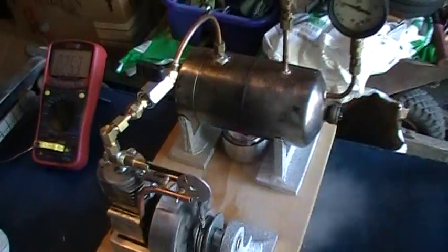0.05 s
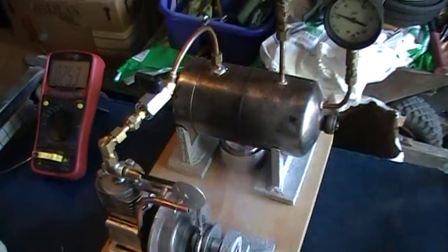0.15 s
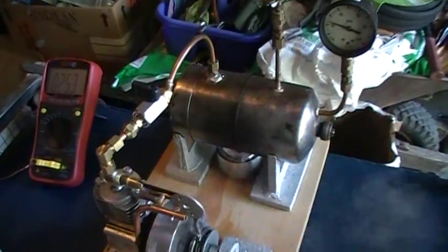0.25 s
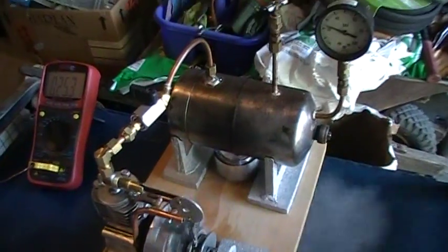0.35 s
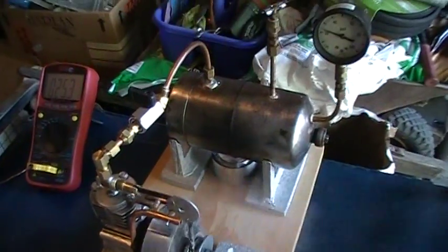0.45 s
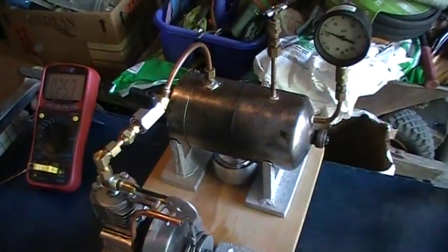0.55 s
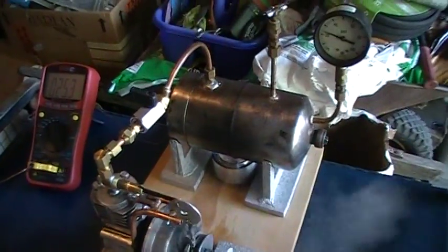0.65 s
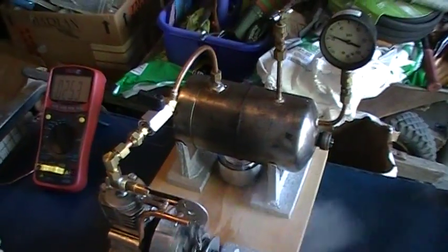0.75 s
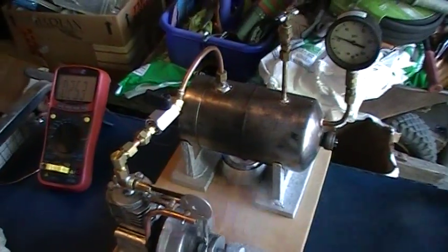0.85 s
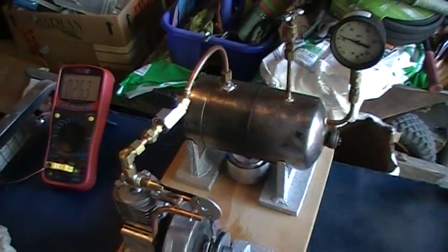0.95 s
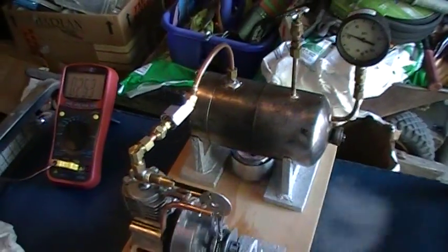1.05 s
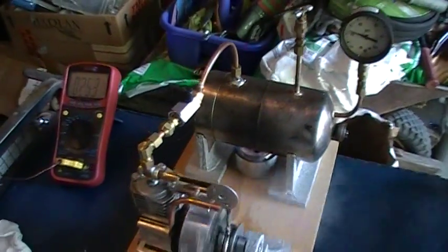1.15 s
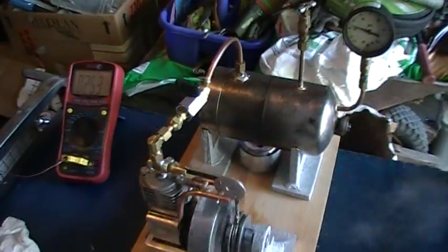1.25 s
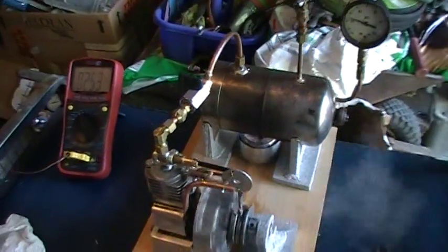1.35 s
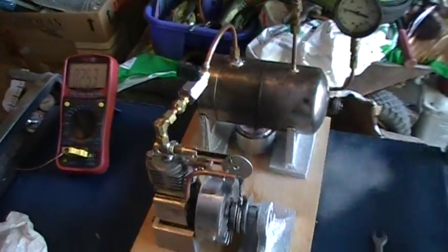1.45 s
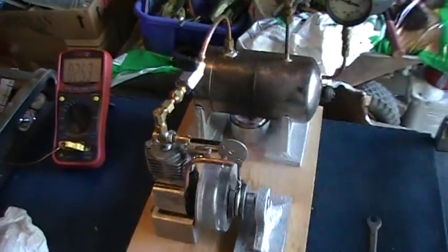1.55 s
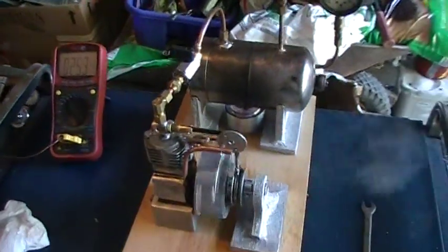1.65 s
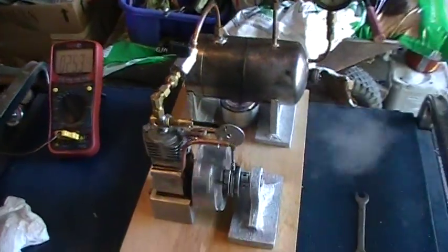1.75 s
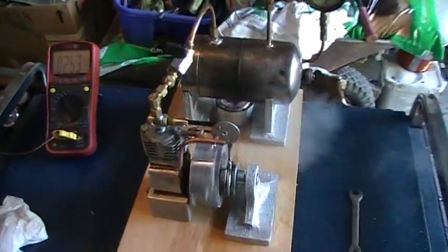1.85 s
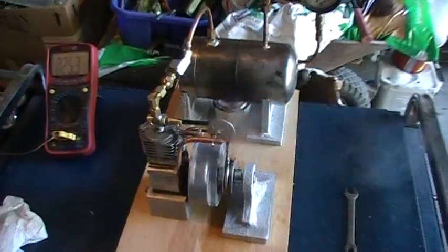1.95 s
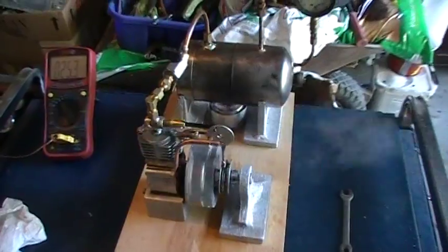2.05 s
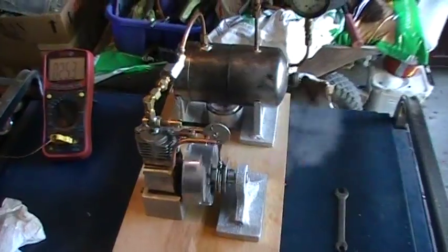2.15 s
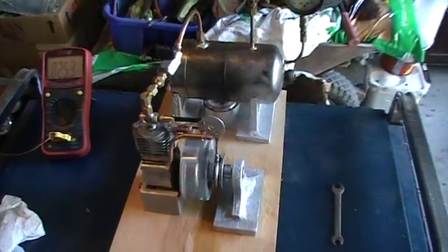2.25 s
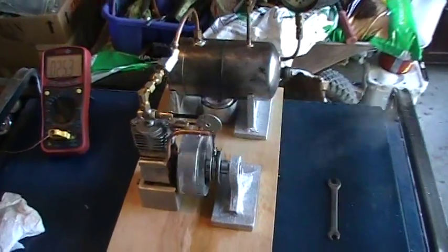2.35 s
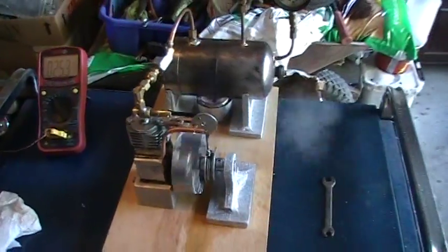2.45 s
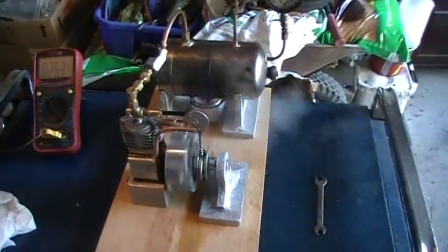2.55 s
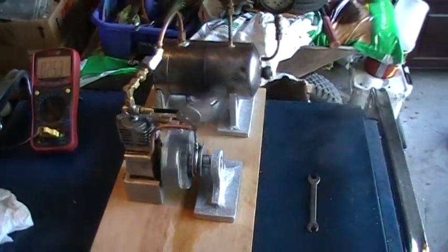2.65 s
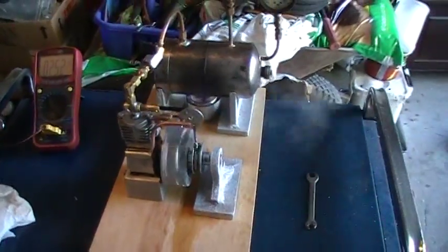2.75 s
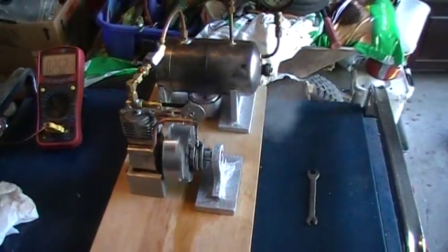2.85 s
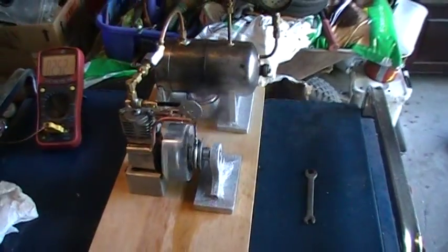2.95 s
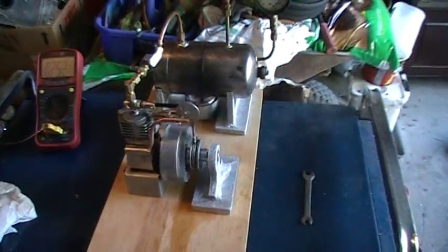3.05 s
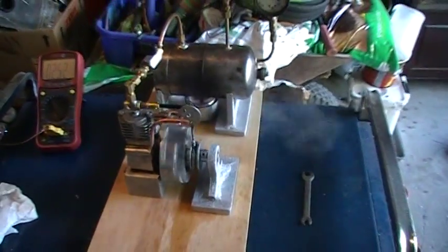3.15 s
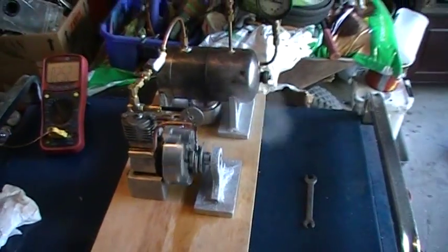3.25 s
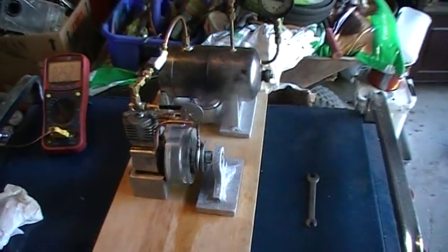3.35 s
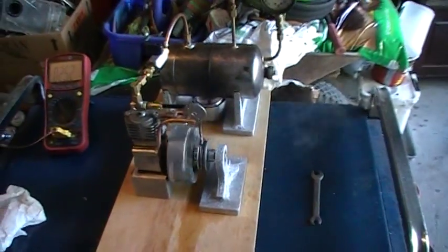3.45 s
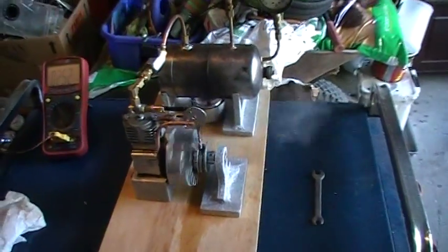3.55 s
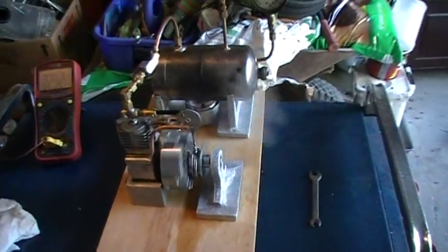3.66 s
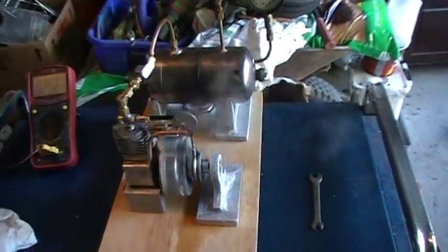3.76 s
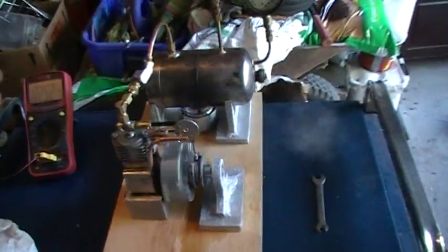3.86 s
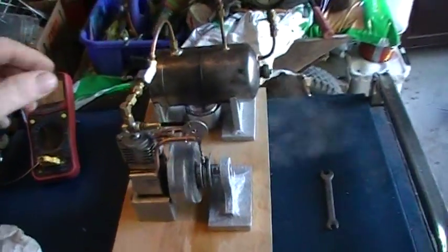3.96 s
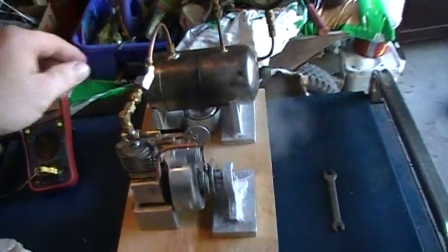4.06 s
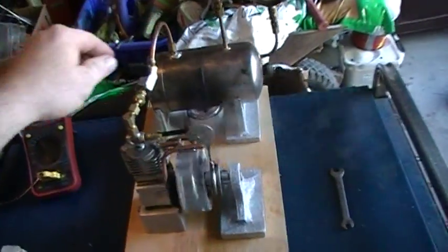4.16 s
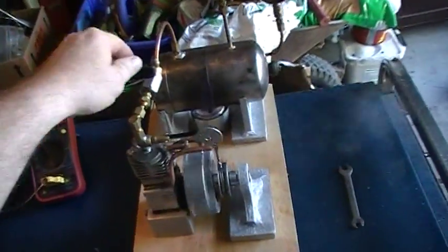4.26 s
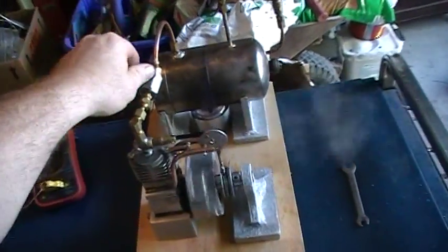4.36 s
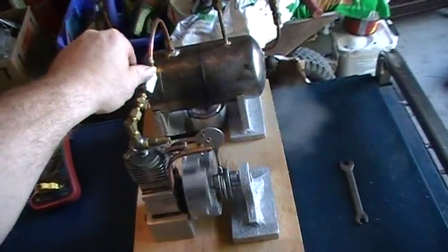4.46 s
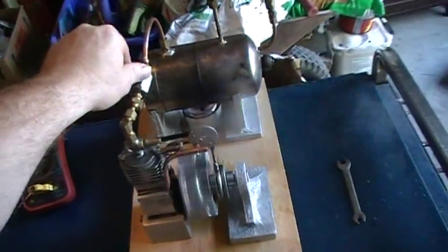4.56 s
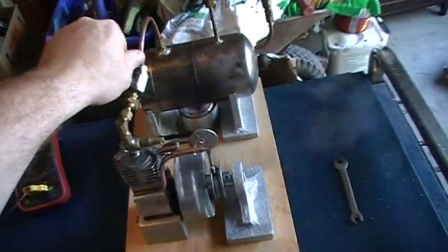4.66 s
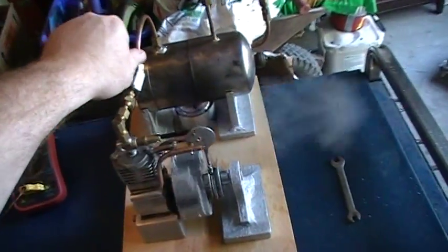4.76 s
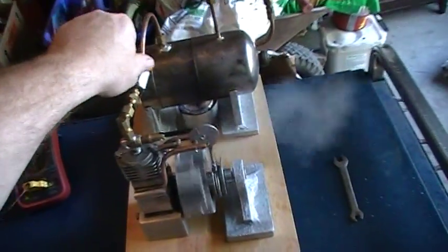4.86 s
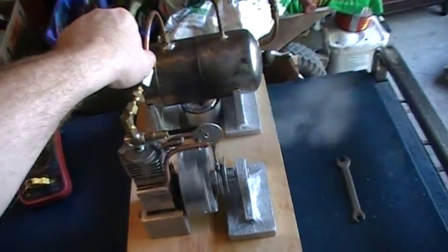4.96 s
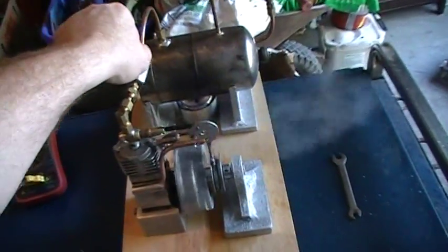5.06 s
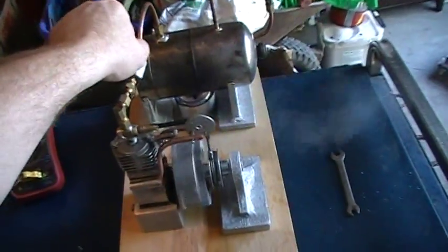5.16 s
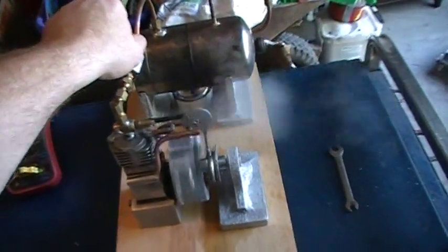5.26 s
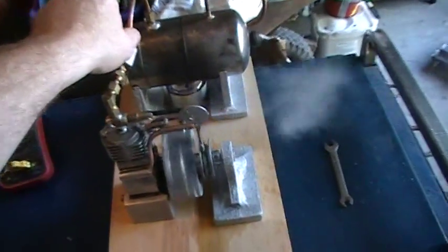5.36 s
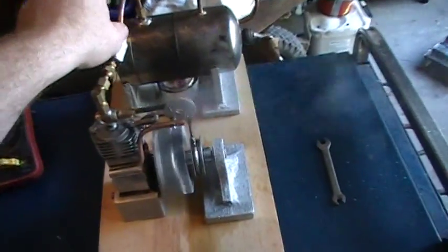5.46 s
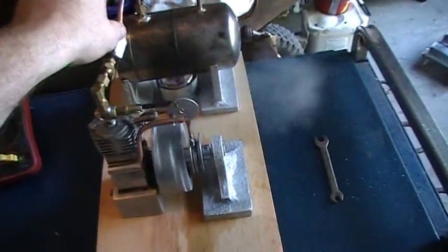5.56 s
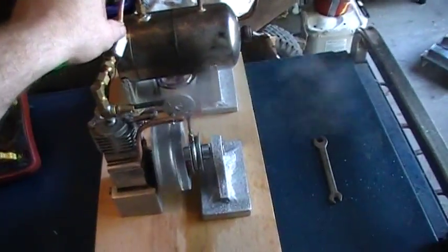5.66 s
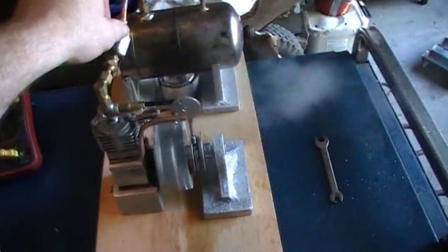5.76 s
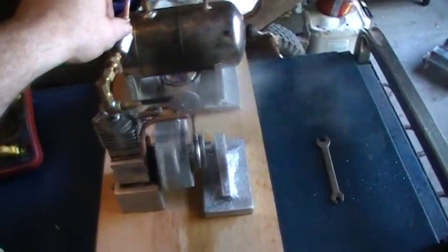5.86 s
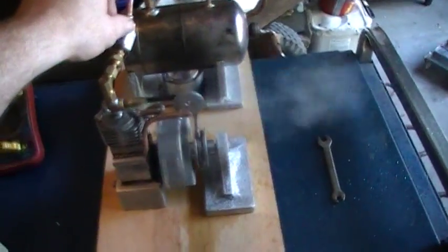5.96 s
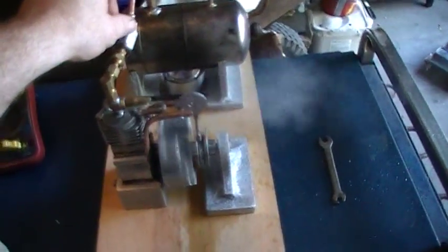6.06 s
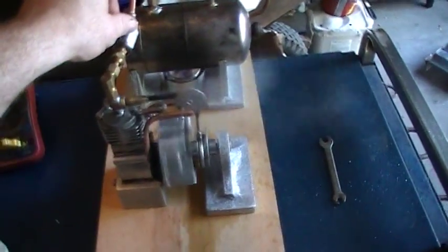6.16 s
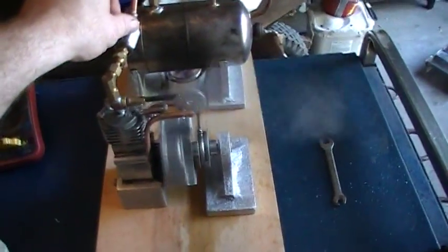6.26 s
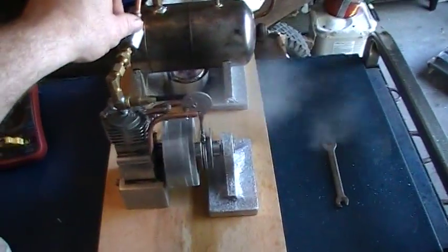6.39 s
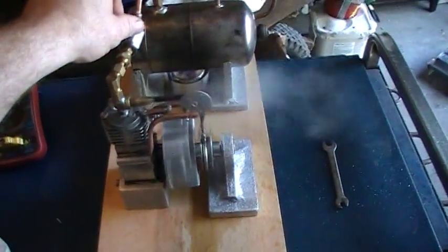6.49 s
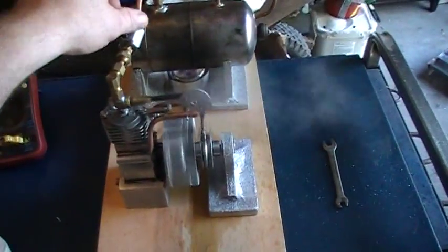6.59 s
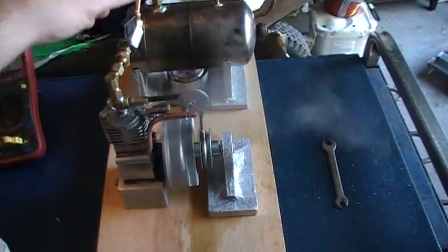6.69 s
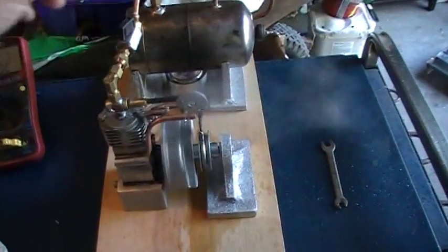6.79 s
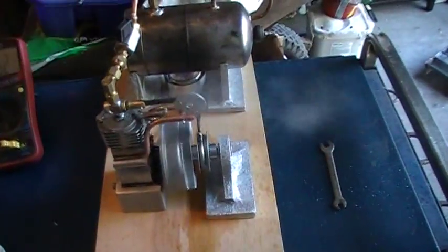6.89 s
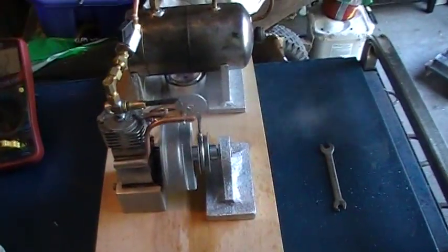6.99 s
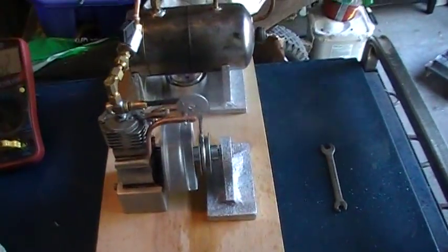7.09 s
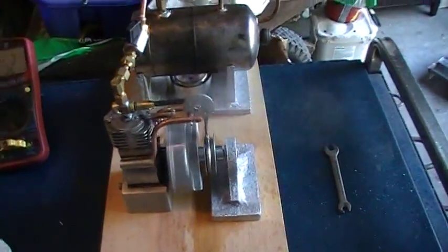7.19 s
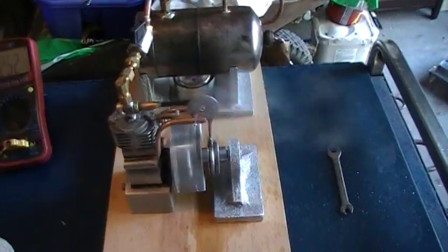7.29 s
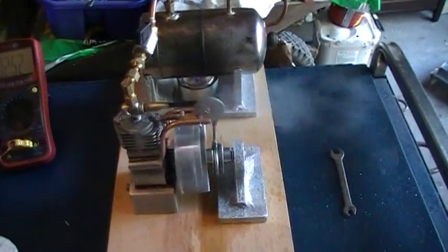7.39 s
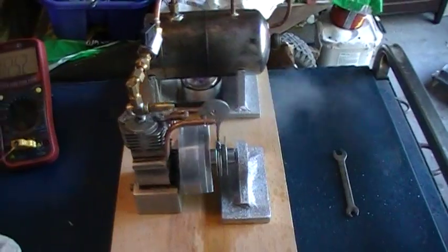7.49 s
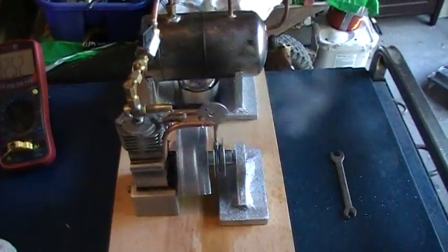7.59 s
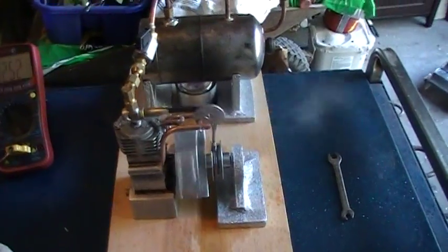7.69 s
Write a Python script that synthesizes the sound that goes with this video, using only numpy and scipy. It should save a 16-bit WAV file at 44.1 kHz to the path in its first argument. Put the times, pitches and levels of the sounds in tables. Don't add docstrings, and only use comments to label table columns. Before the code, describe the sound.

A small steam engine runs close to a stereo microphone in a garage. From 0 to about 4.5 seconds, sharp exhaust puffs come a little over seven per second, each a bright, dry burst of hiss with a second softer push right behind it, strongest in the high treble. Between them are loose metallic knocks, piston rubbing and uneven hollow slaps, some louder, near 1, 1.8, 3.3 and 4.5 seconds. Low hum and a faint leaking hiss sit underneath. At about 4.55 the rhythm stumbles for one or two slow turns, with a loud clack near 4.7, then accelerates: about thirteen puffs a second at 5.1, seventeen at 6.2, nearly twenty-two by the end at 7.7. Puffs merge into a fluttering, buzzing hiss, valve ticks and rod knocks tighten into a steady rattle, and the board hums harder. Short garage echo throughout; it ends still running fast.

```python
import sys
import numpy as np
from scipy import signal
from scipy.fft import rfft, irfft, next_fast_len
from scipy.io import wavfile
from scipy.ndimage import uniform_filter1d

SR = 44100
rng = np.random.default_rng(int(sys.argv[2]) if len(sys.argv) > 2 else 0)


def ratio_of_db(decibels):
    return 10 ** (np.asarray(decibels, float) / 20)


def unload_audio(sound):
    columns = np.transpose(np.atleast_2d(sound))
    steps = np.round(np.clip(columns, -1, 1) * 32767)
    wavfile.write(sys.argv[1], SR, steps.astype(np.int16))


N = 340893

SLOW_PER_S, FAST_PER_S = 7.2, 20.5
STUMBLE_PER_S = 6.6
SIDES = np.array([[1], [-1]])

# (time [s], rate [turns/s])
SPEED = [(0, 7.17), (.862, 7.133), (.871, 6.976), (1.777, 7.39), (2.117, 6.912), (2.233, 7.13),
         (3.425, 7.393), (3.912, 7.603), (4.512, 7.423), (4.548, 5.582), (4.617, 5.824), (4.804, 9.204),
         (5.142, 12.919), (5.458, 14.669), (5.624, 15.095), (6.168, 17.427), (6.693, 19.35), (7.73, 21.938)]
PARTS = {"blast": (-18, -0.34, -1.75, 11, 0.73, 1.3), "push": (-21, 2, -6.5, 2.2, 1.65, -1.5),
         "tick": (-51.5, 8.5, 16, 0.75, 3, -5), "rub": (-40, 3, 6.5, 0.6, 1.4, -8),
         "knock": (-39.5, -3, 11.5, .5, 1.27, -9)}
# (crank angle [turn], slow level [dB], fast level [dB])
BLAST_FLOW = [(-.012, -55, -12), (.012, -7, 2.5), (.04, 0, 3), (.075, -0.5, 2.5), (.11, -6, 2),
              (.14, -16.5, 4.5), (.18, -29.5, -8), (.3, -37.5, -33), (.37, -48, -30), (.5, -70, -60)]
# (crank angle [turn], slow level [dB], fast level [dB])
PUSH_FLOW = [(.15, -40, -28), (.2, -6, 4.5), (.25, -5, -4), (.295, 1.5, 6.5), (.32, -6.5, -4.5),
             (.36, -25, 8.5), (.4, -58, -9), (.45, -70, -50)]
# (frequency [Hz], slow density [dB/Hz], fast density [dB/Hz])
JET_SPECTRUM = [(700, -26, -40), (1190, -25, -19), (1910, -13, -9), (2350, -19, -24), (2780, -9.5, -10.5),
                (3940, -14, -14), (3900, -7.5, -9.5), (5680, -14, -12.5), (7740, -8, -8.5), (8580, -0.5, 1),
                (9360, 4, -8), (10950, -10, -3), (11170, -11, -11.5), (15500, -20.5, -23.5)]
# (time [s], left minus right [dB])
JET_PAN = [(0.0, 1.0), (0.95, 0.5), (1.418, 1.5), (2.86, 0.5), (3.77, 0.5), (5.209, 0.0), (6.05, 1),
           (7.73, 1.0)]
# (crank angle [turn], slow level [dB], fast level [dB])
RUB_PRESSURE = [(0, -1.5, -9), (.1, 1, -0.5), (.3, -4.5, 1), (.45, -9, 2.5), (.62, -10, 2),
                (.635, 6.5, -14), (.72, 0, 7), (.8, -2, -6.5), (.9, -2, 3), (1, 4, 3)]
# (frequency [Hz], width [Hz], slow level [dB], fast level [dB])
BORE_MODES = [(1350, 96, 0.5, -4), (1493, 108, -3, -4), (1680, 98, -5, -4), (1822, 97, -3, -2.5),
              (2008, 220, -5.5, -3), (2450, 190, -6.5, -4), (2790, 380, -12, -8), (4190, 670, -17, -18),
              (5080, 560, -15, -16.5)]
# (time [s], peak level [dB], pitch [Hz])
HARD_SLAPS = [(.0662, -20, 1960), (.406, -29, 1420), (.6509, -21.5, 1880), (.7846, -21.5, 1950),
              (.8175, -36, 1350), (.847, -26, 1920), (.9807, -20.5, 1820), (1.1184, -15, 1910),
              (1.2567, -34, 1340), (1.667, -21, 1970), (1.7674, -15, 1930), (1.8233, -19, 2020),
              (1.933, -16, 1700), (2.0383, -27, 1840), (2.0934, -27, 1350), (2.5072, -32, 1640),
              (2.7526, -25, 1340), (3.152, -17, 1340), (3.1847, -22, 1340), (3.3204, -16.5, 1410),
              (3.342, -24, 1360), (3.5505, -29, 1350), (3.7127, -21, 1340), (3.7362, -21, 1340),
              (4.0114, -26, 1680), (4.2617, -17, 1650), (4.4902, -20, 1360), (4.5251, -16.5, 1390),
              (4.684, -14, 1790)]
# (crank angle [turn], slow level [dB], fast level [dB], brightness [0-1])
CONTACTS = [(.0, -7, -32, 0.5), (.15, 1, -6, 0.95), (.24, -5.5, -5.5, 0), (.36, -7.5, -3.5, 1),
            (.45, -9, -9.5, 0.7), (.52, -12, 6.5, 0.2), (.645, 0, -27, 0.28), (.69, -5, 0.5, 0.89),
            (.75, -32, -23, 0.27), (.79, -11, -2, 0.1), (.93, -1, -2.5, 0)]
# (frequency [Hz], level [dB], t60 [s])
FRAME_MODES = [(326, -20, 0.05), (546.3, -7, 0.047), (583, -5, 0.058), (717, -0.5, 0.047),
               (750.6, -2, 0.042), (862, -6, 0.027), (939, -6, 0.045), (1030.6, -5, 0.033),
               (1340, -16.5, 0.025), (1978, -11.5, 0.054), (2990, -22.5, 0.075), (4390, -11.5, 0.012)]
# (time [s], knock gain [dB])
FRAME_PLAY = [(0, 1), (1.9, 2), (2.3, -0.5), (4.1, -1), (4.35, 5.5), (5.2, -0.5), (6.3, -1), (6.8, -1),
              (7.73, -1)]
# (frequency [Hz], level [dB], t60 [s])
BEARING_MODES = [(730, -13, 0.052), (987, 5, 0.034), (870, -15, 0.015)]
# (frequency [Hz], density [dB/Hz])
TICK_SPECTRUM = [(1000, -10), (2500, 3.5), (4500, -3), (6500, 1.5), (9300, 3.5), (12000, -6), (15800, -37)]
# (frequency [Hz], level [dB])
BOARD_RESPONSE = [(20, -40), (45, -31), (65, -21), (88, -12), (104, -9), (135, -13), (166, -1), (190, -8),
                  (214, -2), (250, -11), (330, -12), (450, -17)]
STRONG_MULTIPLES = (5, 8, 10)
# (time [s], level [dB])
WHISTLE_LEVEL = [(0, -67.5), (1.5, -58), (2.4, -51), (4.101, -55), (4.6, -51), (5.6, -52), (6.2, -50),
                 (7.73, -48)]
# (frequency [Hz], density [dB/Hz])
HUM_SPECTRUM = [(25, -32), (60, -22), (103, -16), (125, -25), (166, 1), (188, -4.5), (214, 7.5),
                (250, -9.5), (340, -2), (400, -4.5), (500, -20), (700, -35)]
# (frequency [Hz], left minus right [dB])
LEFT_DB = [(60, -1.5), (110, -1.0), (200, -1.0), (380, -1.0), (700, -0.5), (1290, 1.0), (2380, 0.0),
           (4400, 0.0), (8120, 1.0), (15000, -1.0)]
# (frequency [Hz], left lead [rad])
LEFT_LEADS = [(0, 0), (950, 0.1), (2760, -0.0), (7750, 0.1), (10100, -0.2), (11900, 0.4), (12400, 0.2),
              (16400, 0.0)]


def highpass(x, order, hz):
    return signal.sosfilt(signal.butter(order, hz, "high", fs=SR, output="sos"), x)


def lowpass(x, order, hz):
    return signal.sosfilt(signal.butter(order, hz, fs=SR, output="sos"), x)


def at_hz(points, hz):
    points = np.array(points)
    return np.interp(np.log(hz + 1e-3), np.log(points[:, 0]), points[:, 1])


def at_time(points):
    return np.interp(np.arange(N) / SR, *np.transpose(points))


def rms_one(x):
    return x / np.sqrt(np.mean(x ** 2) + 1e-20)


def coloured(spectrum):
    size = next_fast_len(N)
    hz = np.fft.rfftfreq(size, 1 / SR)
    white = rfft(rng.standard_normal(size))
    return rms_one(irfft(white * ratio_of_db(at_hz(spectrum, hz)), size)[:N])


def drift(rate):
    r = np.exp(-32 * np.pi * rate / SR)
    chance = rng.standard_normal(N // 16 + 3002)
    slow = signal.lfilter([1], [1, -2 * r, r * r], chance)[3000:]
    return np.interp(np.arange(N) / 16, np.arange(len(slow)), rms_one(slow))


def ring(clicks, hz, t60):
    r, w = ratio_of_db(-60 / (t60 * SR)), 2 * np.pi * hz / SR
    return signal.lfilter([0, np.sin(w)], [1, -2 * r * np.cos(w), r * r], clicks + 1e-18)


def resonate(x, hz, width_hz):
    r = np.exp(-np.pi * width_hz / SR)
    return (1 - r * r) * signal.lfilter([1, 0, -1], [1, -2 * r * np.cos(2 * np.pi * hz / SR), r * r], x)


def climb(per_s):
    return np.log(per_s / SLOW_PER_S) / np.log(FAST_PER_S / SLOW_PER_S)


def turns_done(t):
    first_exhaust_s, step_s = .0011, .0005
    grid = np.arange(-.2, 8, step_s)
    done = np.cumsum(np.interp(grid, *np.transpose(SPEED))) * step_s
    return np.interp(t, grid, done - np.interp(first_exhaust_s, grid, done))


def crank():
    t = np.arange(-.2, 8, .0005)
    turn_count = 86
    edges = np.interp(np.arange(-1, turn_count + 2), turns_done(t), t)
    start, length = edges[:-1], np.diff(edges)
    return start, length, np.clip(climb(1 / length), 0, 1)


def in_time(per_turn_value):
    return np.interp(np.arange(N) / SR, crank()[0], per_turn_value)


def per_turn(part):
    start, length, pace = crank()
    cold_db, warm_db, fast_db, bend, scatter_db, stumble_db = PARTS[part]
    warm_up_s = 2.33
    warmth = 1 - np.exp(-np.maximum(start, 0) / warm_up_s)
    steady_db = cold_db + warm_db * warmth + fast_db * pace ** bend
    stumble = length > 1 / STUMBLE_PER_S
    return steady_db + stumble_db * stumble + scatter_db * rng.standard_normal(len(start))


def over_turn(shape, level_db):
    start, length, pace = crank()
    angle = np.interp(np.arange(N) / SR, start, np.arange(len(start))) - shape[0][0]
    turn = np.minimum(angle.astype(int), len(start) - 1)
    part, slow_db, fast_db = np.transpose(shape)
    slow = np.interp(angle % 1 + part[0], part, slow_db)
    fast = np.interp(angle % 1 + part[0], part, fast_db)
    return ratio_of_db(slow + pace[turn] * (fast - slow) + level_db[turn])


def add(clicks, part, gains):
    start, length, pace = crank()
    at = np.round((start + part * length) * SR).astype(int)
    inside = (at >= 0) & (at < N)
    clicks[at[inside]] += gains[inside]
    return clicks


def exhaust():
    since = crank()[0] - 4.65
    surge_db = 1.5 * (since > 0) * np.exp(-since / 1)
    blast = over_turn(BLAST_FLOW, per_turn("blast") + surge_db)
    flow = np.hypot(blast, over_turn(PUSH_FLOW, per_turn("push")))
    hiss = jet_noise(patchy_db=2.5)
    smooth = coloured(np.array(JET_SPECTRUM)[:, :2])
    wide = highpass(smooth, 2, 5500)
    sputter = ratio_of_db(1.0 + 0.4 * drift(380))
    direct = flow * sputter * (hiss + .16 * wide * SIDES)

    echo_db, echo_t60_s = -9, 0.24
    fall = ratio_of_db(-120 / (echo_t60_s * SR))
    echo = np.sqrt(signal.lfilter([1 - fall], [1, -fall], flow ** 2 + 1e-18))
    late = np.roll(smooth, 9000) + .95 * np.roll(wide, 23000) * SIDES
    late = lowpass(late, 1, 8000)
    echo_gain = ratio_of_db(echo_db - 2.6 * in_time(crank()[2]))
    pan_db = at_time(JET_PAN) - .5
    jet = (direct + echo_gain * echo * late) * ratio_of_db(pan_db / 2 * SIDES)
    return highpass(jet, 2, 200)


def jet_noise(patchy_db):
    size = next_fast_len(N)
    hz, pace = np.fft.rfftfreq(size, 1 / SR), in_time(crank()[2])
    white = rfft(rng.standard_normal(size))
    table, out = np.array(JET_SPECTRUM), 0
    slow, fast = table[:, :2], table[:, ::2]
    centres = np.geomspace(1400, 14000, 22)
    for k, centre_hz in enumerate(centres):
        share = np.interp(np.log(hz + 1), np.log(centres), np.arange(22) == k)
        change_db = at_hz(fast, centre_hz) - at_hz(slow, centre_hz)
        band = irfft(white * share * ratio_of_db(at_hz(slow, hz)), size)[:N]
        out = out + band * ratio_of_db(pace * change_db + patchy_db * drift(10.7))
    return rms_one(out)


def thump():
    pace = crank()[2]
    scatter_db = 4.5 * (1 - pace) * rng.standard_normal(len(pace))
    gains = ratio_of_db(-54 + 1.5 * pace + scatter_db)
    return ring(add(np.zeros(N), .03, gains), hz=55, t60=0.053)


def linkage():
    start, length, pace = crank()
    chance = rng.standard_normal((len(start), len(CONTACTS), len(FRAME_MODES) + 1))
    knock_db = per_turn("knock") + np.interp(start, *np.transpose(FRAME_PLAY))
    looseness = 1 - 0.48 * pace
    rattle_db, rattle_per_s = -11.5, 420
    loose = (rng.random(N) < rattle_per_s / SR) * rng.standard_normal(N)
    loose *= ratio_of_db(rattle_db + in_time(uniform_filter1d(knock_db, size=3) - 1.2 * pace))
    out = 0
    for m, (hz, mode_db, t60) in enumerate(FRAME_MODES):
        clicks = loose * (-1) ** m
        for c, (part, slow_db, fast_db, bright) in enumerate(CONTACTS):
            tilt_db = 12 * (bright - .4) * np.log2(hz / 800)
            contact_db = slow_db + pace * (fast_db - slow_db) + tilt_db
            db = knock_db + contact_db + 4.07 * looseness * chance[:, c, m]
            when = part + 0.0039 * looseness * chance[:, c, -1]
            add(clicks, when, ratio_of_db(db) * (-1) ** (c + m))
        out = out + ratio_of_db(mode_db + 2.0) * ring(clicks, hz, t60)
    return highpass(out, 2, 280)


def big_end():
    start, length, pace = crank()
    play_db = np.interp(start, *np.transpose(FRAME_PLAY))
    db = per_turn("knock") + play_db + 7.0 - 60 * (1 - pace)
    clicks = add(np.zeros(N), .685, ratio_of_db(db))
    clicks = add(clicks, .735, ratio_of_db(db - 14.0))
    knock = sum(ratio_of_db(mode_db) * ring(clicks, hz, t60) for hz, mode_db, t60 in BEARING_MODES)
    return highpass(knock, 4, 520)


def clacks():
    size = 3000
    out, t = np.zeros(N + size), np.arange(size) / SR
    slaps = HARD_SLAPS + light_slaps()
    rough = rng.standard_normal((len(slaps), size)) * ratio_of_db(-60 * t / .018)
    for (s, db, hz), contact in zip(slaps, rough):
        slap = ring(contact, hz, .035)
        slap = slap - .8 * ring(contact, .74 * hz, .018)
        slap = slap + .8 * ring(contact, 1.35 * hz, .012)
        at = round(s * SR)
        out[at:at + size] += ratio_of_db(db - 6.5) * slap / abs(slap).max()
    return out[:N]


def light_slaps():
    start, length, pace = crank()
    chance = rng.standard_normal((len(start), 2))
    early = (start > .9) & (start < 1.35)
    warm_hz, cold_hz = 1340, 1950
    hz = np.where((chance[:, 0] > start - 1.0) & ~early, cold_hz, warm_hz)
    when = start + np.where(early, .51, .62) * length
    db = -31 + 2.5 * early + 4.5 * chance[:, 1]
    steady = (start > 0) & (pace < .4) & (length < 1 / STUMBLE_PER_S)
    return [tuple(row) for row in np.c_[when, db, hz][steady]]


def piston():
    slips = (rng.random(N) < 260 / SR) * rng.uniform(-0.91, 1, N) * ratio_of_db(21.5)
    grains = (rng.standard_normal(N) + slips) * over_turn(RUB_PRESSURE, per_turn("rub") - 1.5)
    out, pace = 0, in_time(crank()[2])
    for k, (hz, width_hz, slow_db, fast_db) in enumerate(BORE_MODES):
        db = slow_db + pace * (fast_db - slow_db) + 1.95 * drift(54)
        out = out + (-1) ** k * ratio_of_db(db) * resonate(grains, hz, width_hz)
    return ratio_of_db(9) * out


def valve():
    lift_at, t60_s = .622, 0.015
    fall = ratio_of_db(-60 / (t60_s * SR))
    lift = add(np.zeros(N), lift_at, ratio_of_db(per_turn("tick") + 7.0))
    return signal.lfilter([1], [1, -fall], lift + 1e-18) * coloured(TICK_SPECTRUM)


def board():
    t = np.arange(0, N + 8, 8) / SR
    per_s = uniform_filter1d(np.interp(t, *np.transpose(SPEED)), size=900, mode="nearest")
    turns = turns_done(t)
    force_db = -78 + 27 * np.sqrt(np.clip(climb(per_s), 0, 2))
    out, wobble = 0, np.resize(drift(1.2)[::8], len(turns))
    for k in range(1, 25):
        db = force_db + 4 * (k in STRONG_MULTIPLES) + at_hz(BOARD_RESPONSE, k * per_s)
        db = db + 1.2 * np.roll(wobble, 1700 * k)
        out = out + ratio_of_db(db) * np.sin(2 * np.pi * (k * turns + rng.random()))
    return signal.resample_poly(out, 8, 1)[:N]


def whistle():
    tone = resonate(rng.standard_normal(N), hz=9200, width_hz=500)
    return ratio_of_db(at_time(WHISTLE_LEVEL) + 3.3 * drift(4.9)) * rms_one(tone)


def leak():
    hiss = coloured(TICK_SPECTRUM)
    return ratio_of_db(-51 + 1.1 * drift(5)) * (hiss + 0.62 * hiss[::-1] * SIDES)


def floor():
    hum = coloured(HUM_SPECTRUM)
    return ratio_of_db(-53.5 - 7 * in_time(crank()[2])) * (hum + .22 * hum[::-1] * SIDES)


def rumble():
    air = signal.lfilter([1], [1, -.95], rng.standard_normal((2, N)))
    return ratio_of_db(-69) * rms_one(lowpass(air, 1, 70))


def garage(x):
    t60_s, onset_s = 0.46, 0.016
    t = np.arange(int(.6 * SR)) / SR
    shared, own = rng.standard_normal(len(t)), rng.standard_normal((2, len(t)))
    tail = (shared + 0.37 * own) * ratio_of_db(-60 * t / t60_s) * np.clip(t / onset_s, 0, 1)
    tail = lowpass(tail, 1, 6100)
    return signal.fftconvolve(x[None], tail / np.sqrt(np.sum(tail ** 2) / 2), axes=1)[:, :N]


def ports(x):
    size = next_fast_len(N + 4096)
    hz = np.fft.rfftfreq(size, 1 / SR)
    lead = np.interp(hz, *np.transpose(LEFT_LEADS))
    half = ratio_of_db(at_hz(LEFT_DB, hz) / 2) * np.exp(.5j * lead)
    return irfft(rfft(x, size) * np.array([half, 1 / half]), size)[:, :N]


def scene():
    metal = linkage() + big_end() + clacks() + piston() + valve()
    metal = highpass(metal, 4, 290)
    engine = exhaust() + thump() + metal + ratio_of_db(-11) * garage(metal) + board()
    return ports(engine + whistle() + leak() + floor() + rumble())


def roll_off(x):
    return signal.sosfilt(signal.butter(12, 16810, fs=SR, output="sos"), x)


def record(dry):
    x = .65 * np.tanh(dry / .65)
    x = highpass(x, 2, 60)
    top_cut = signal.cheby2(12, 40, 15900 * 1.02, fs=SR, output="sos")
    mix = signal.sosfilt(top_cut, x)
    return roll_off(mix)


dry = scene()
out = record(dry)
unload_audio(out)
```